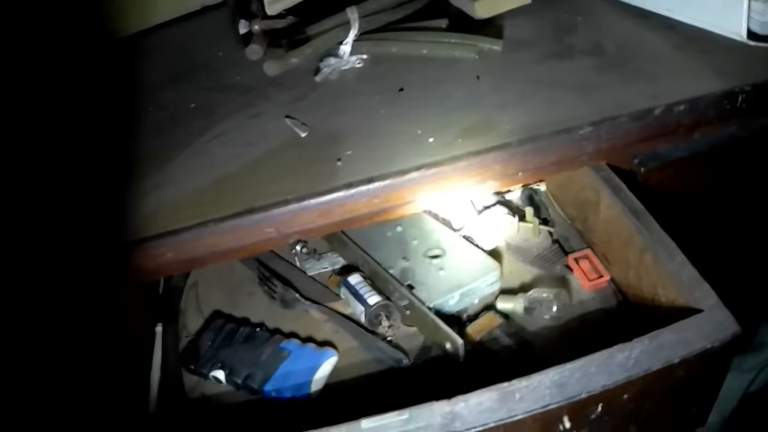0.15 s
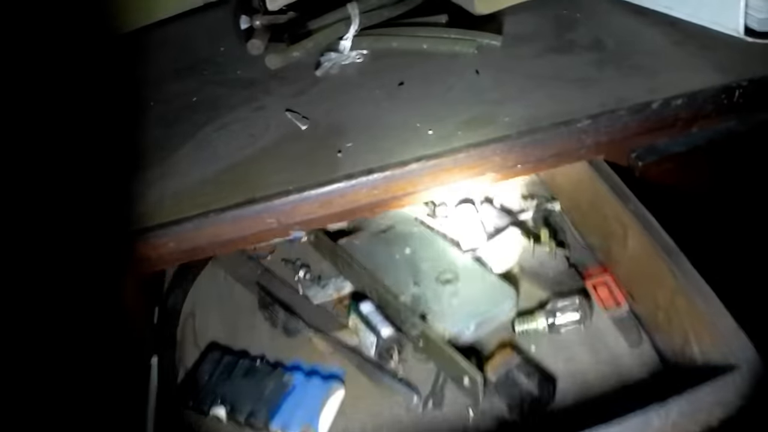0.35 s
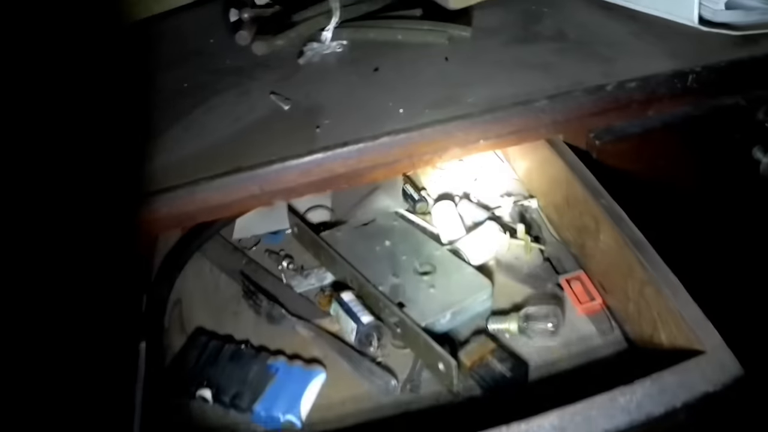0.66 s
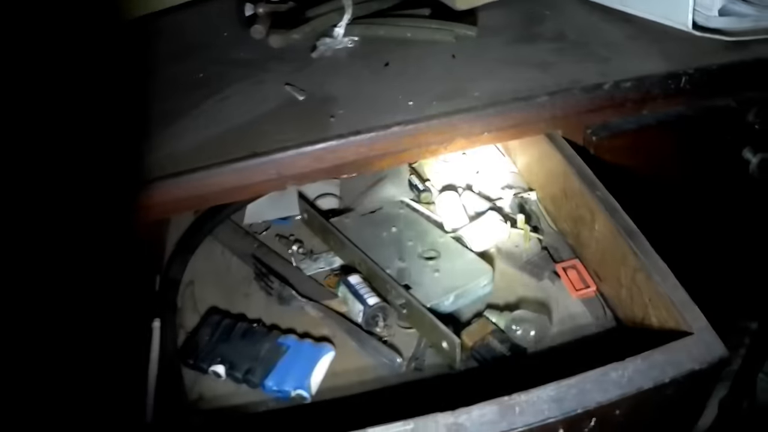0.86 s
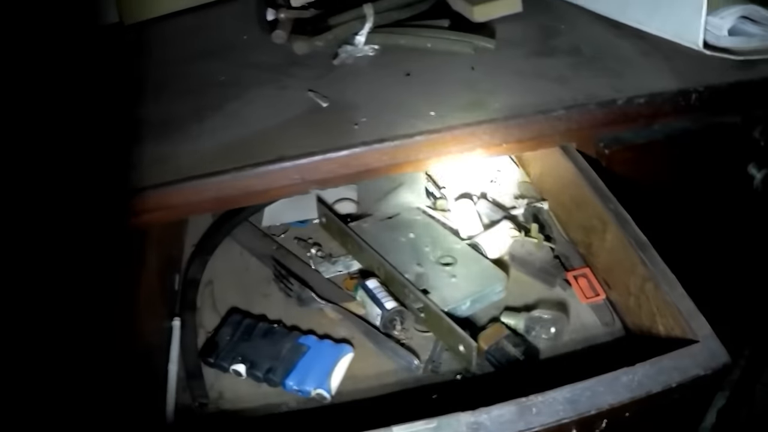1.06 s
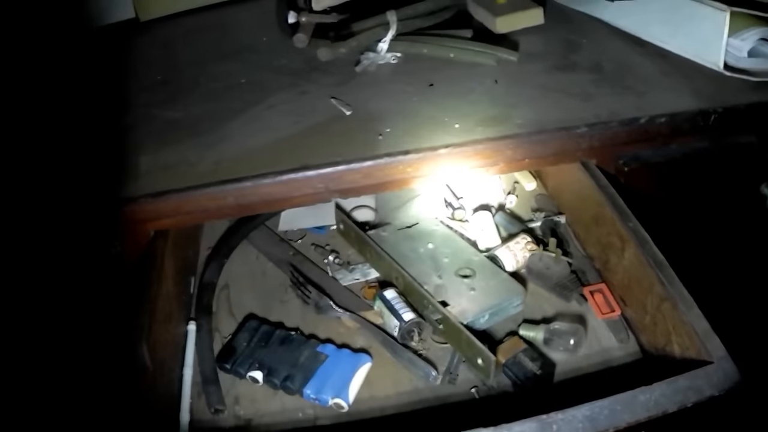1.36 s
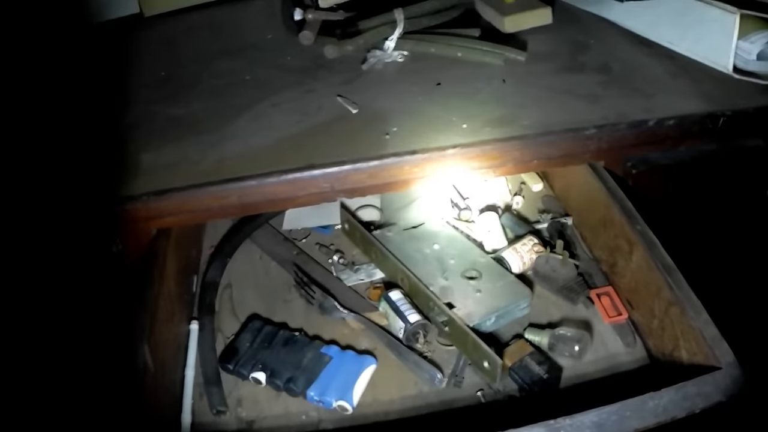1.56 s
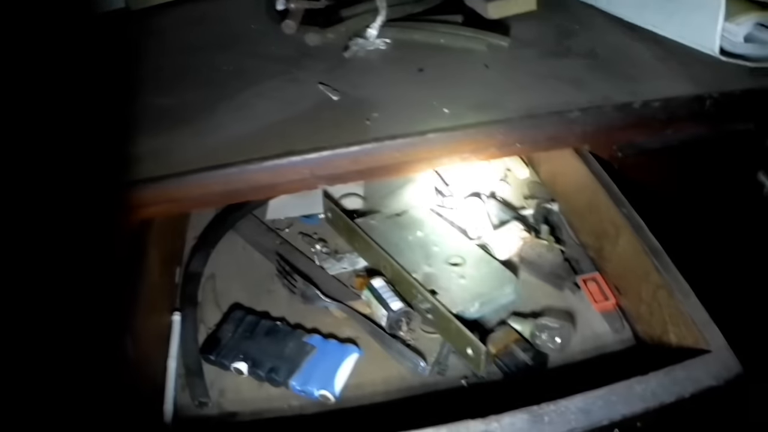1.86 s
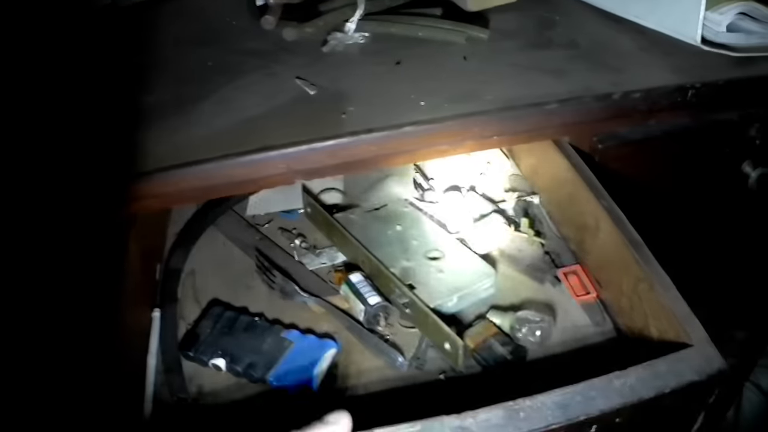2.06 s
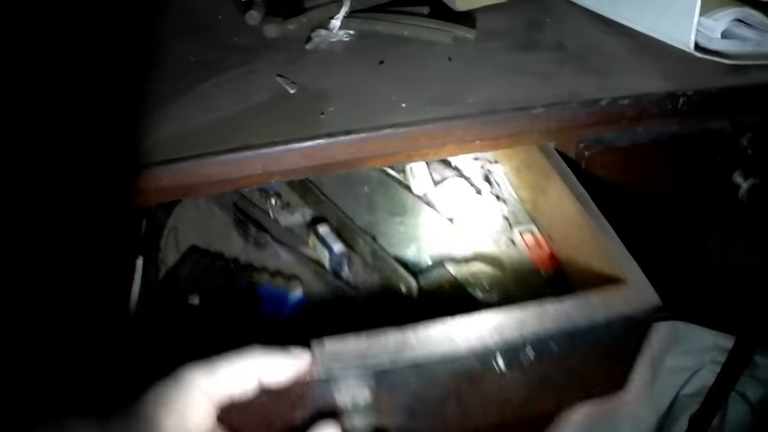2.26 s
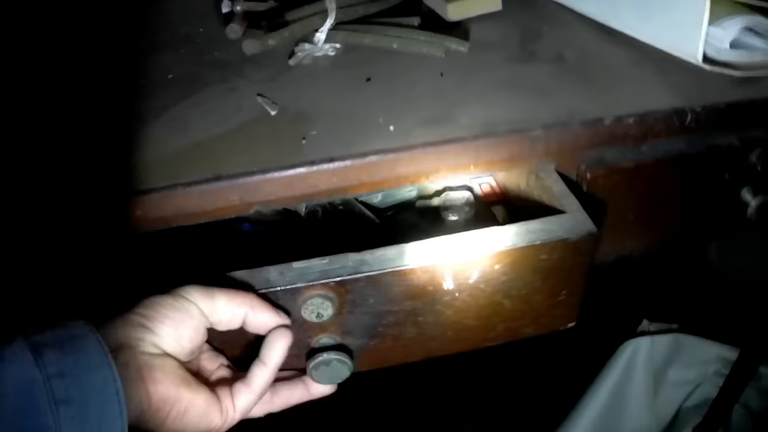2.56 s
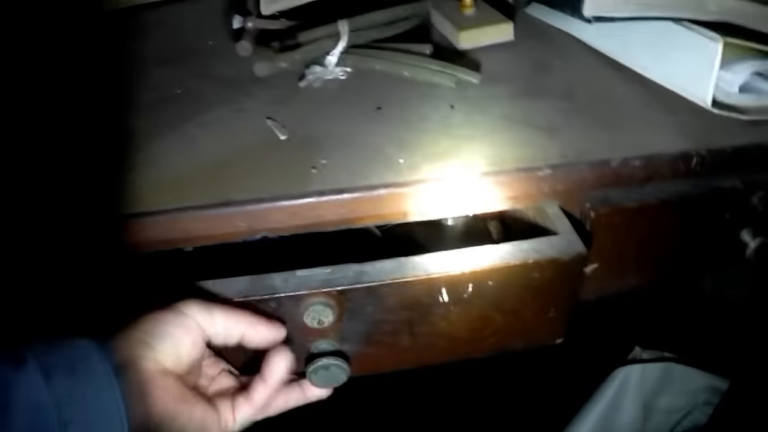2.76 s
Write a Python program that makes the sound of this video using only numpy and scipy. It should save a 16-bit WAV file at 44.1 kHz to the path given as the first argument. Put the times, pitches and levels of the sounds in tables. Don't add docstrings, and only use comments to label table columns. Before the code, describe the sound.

An old wooden drawer gives a dull knock at 0 s, then scrapes open, banging hollowly around 0.2-0.5 s. A glass bulb clinks at 0.6 and rolls; junk ticks and a boxy thump lands near 0.87. From 1.1 to 2 s only quiet room hush, very faint crickets and whine. At 2.2 a sharp rattling knock, then it slides shut with small bumps until 2.75, ending in faint rubs.

```python
import sys
import numpy as np
from scipy import signal
from scipy.fft import rfft, irfft
from scipy.io import wavfile
from scipy.ndimage import uniform_filter1d

SR = 44100
rng = np.random.default_rng(int(sys.argv[2]) if len(sys.argv) > 2 else 0)


def store_pcm(level_fs):
    pcm = np.round(np.clip(level_fs, -1, 1) * 32767).astype(np.int16)
    wavfile.write(sys.argv[1], SR, np.atleast_2d(pcm).T)


def amplitude_ratio(level_db):
    exponent = np.asarray(level_db, float) / 20
    return 10 ** exponent


N = 127890

# t/s, level/dB, box rumble/dB, grit/dB
PULL_DRAG = [
    (.085, -48.5, -20, -6),
    (.15, -36.5, -44, -25),
    (.2, -27, -28, 4.5),
    (.25, -17, 10.5, 2.5),
    (.3, -24.5, 7.5, -16),
    (.36, -25, -3, -24),
    (.45, -29.5, -23, -12),
    (.47, -34, 6.5, -12),
    (.6, -40, 6, -22),
]
PUSH_DRAG = [
    (1.97, -65.5, 23, -6),
    (2.08, -48.5, 3, -8),
    (2.13, -29.5, 1, -9),
    (2.25, -23.5, 1.5, -7.5),
    (2.45, -28, 3.5, -11),
    (2.49, -35.5, 9.5, -18),
    (2.62, -30.5, -9, -1),
    (2.68, -37, 9.5, -6),
    (2.78, -46, 8.5, -1),
]
NUDGE_DRAG = [
    (2.79, -48, 10, -3),
    (2.835, -55, 14, 4),
    (2.845, -46, -12, -6),
    (2.865, -48, -3, -3),
    (2.876, -41, -27, -19),
    (2.9, -47, 6, -9),
]
SETTLE_DRAG = [
    (0, -35.5, 14.5, 6.2),
    (.04, -65, 3, 2),
    (.1, -70, 4, 4),
]
SCUFF_DRAG = [
    (.95, -47, 0, -6),
    (1.035, -45, -5, -10),
    (1.05, -50, -4, -6),
]
# f/Hz, level/dB
SCRAPE_SPECTRUM = [(100, -55), (220, -9), (500, -6), (1100, -6), (2600, -13), (4200, -24), (12500, -54.5),
                   (15500, -76)]
# f/Hz, width/Hz, level/dB
RUNNER_MODES = [(1100, 420, -12), (1527, 36, -14), (2300, 310, -1), (2490, 71, -7), (3500, 1100, -17),
                (6580, 760, -8), (11000, 700, -20.5)]
# t/s, level/dB, length/s, hardness/Hz
THUDS = [(0.001, -19, 0.017, 654), (0.022, -25.5, 0.023, 396), (0.211, -9, 0.011, 1100),
         (0.231, -4, 0.014, 840), (0.253, -4.5, 0.025, 940), (0.281, -31, 0.024, 900),
         (0.375, -6, 0.015, 620), (0.392, -16, 0.014, 696), (0.404, -15.5, 0.0071, 900),
         (0.414, -13, 0.0038, 700), (0.429, -18, 0.0069, 600), (0.446, -21, 0.0097, 900),
         (0.486, -18, 0.011, 1210), (0.866, -15, 0.018, 600), (0.876, -13.5, .014, 870),
         (0.901, -22, .005, 700), (0.927, -28, 0.0098, 450), (2.211, -10.5, 0.011, 1200),
         (2.232, -14, 0.0036, 500), (2.254, -20, 0.0076, 1100), (2.381, -22, .012, 396),
         (2.57, -22, .008, 910), (2.607, -21, 0.018, 905), (2.621, -24, 0.021, 800), (2.639, -29, .01, 700),
         (2.653, -26, 0.0056, 450), (2.678, -23.5, 0.0063, 1000), (2.694, -35, 0.0094, 900),
         (2.732, -28.5, 0.0087, 1200)]
# f/Hz, level/dB, t60/s
BOX_MODES = [(95.4, -12.5, 0.13), (159, -4, 0.033), (237.5, 6.5, 0.035), (304.5, -3, 0.042),
             (380.4, 1.5, 0.068), (504.7, -9, 0.08), (571.5, -2.5, 0.057), (667, 0.5, 0.026),
             (750, -7, 0.017), (837, -4.5, 0.066), (946, -0.5, 0.032), (1162, 5.5, 0.025),
             (1470, -31, 0.054), (2000, -12.5, 0.071)]
# t/s, level/dB, f/Hz, rise/s
SHOVES = [(0.257, -31, 70, .013), (0.41, -39, 62, 0.0082), (0.86, -16, 246, 0.0075),
          (.866, -18, 390, 0.0043), (.868, -22.5, 139, 0.01), (.876, -19, 246.4, 0.0052),
          (.38, -12.5, 242, 0.0077), (.243, -13.5, 520, .012), (2.215, -13.5, 240, 0.0043),
          (2.62, -32, 360, 0.017), (2.27, -31, 55.3, 0.033), (0.21, -14.5, 200, 0.019),
          (0.24, -12, 194, 0.0082)]
# t/s, peak level/dB, f/Hz, t60/s
TICKS = [(.68, -30.5, 582, 0.059), (0.14, -26, 1080, 0.021), (0.167, -25, 1000, 0.019),
         (0.354, -20, 2490, 0.053), (.49, -19, 890, 0.013), (.491, -26, 2820, 0.0073),
         (0.527, -39, 3000, 0.0052), (0.551, -31, 4040, 0.008), (.55, -25, 496, .01),
         (0.551, -23, 2000, 0.0068), (0.723, -27.5, 897, 0.029), (.815, -24.5, 2180, 0.016),
         (.816, -32, 470, 0.034), (0.833, -28, 466, .015), (0.838, -20.5, 2390, 0.0078),
         (.839, -30, 513, .03), (.844, -28, 2300, 0.012), (.861, -32, 2200, 0.0089),
         (1.13, -44, 450, 0.033), (0.151, -23, 1100, 0.024), (1.319, -38.5, 1044, 0.02),
         (2.028, -37.5, 753, 0.071), (2.156, -18, 2300, 0.016), (2.164, -12, 2437, 0.026),
         (2.171, -23, 2540, 0.024), (2.19, -22, 2500, 0.017), (2.209, -9.5, 1490, 0.016),
         (2.211, -23, 955, 0.0087), (2.212, -9, 2030, 0.021), (2.223, -13, 1800, .003),
         (2.21, -12.5, 1210, .015), (2.213, -13, 1650, .012), (2.211, -16, 2400, .01),
           (2.215, -13, 700, .012), (2.262, -17, 1010, .015), (2.566, -27, 900, .02),
           (2.607, -23.5, 910, .025), (2.622, -24, 394, .04), (2.628, -23, 840, 0.03),
           (2.639, -26, 370, .04), (2.652, -22.5, 382, .015), (2.696, -23.5, 526, 0.048),
           (2.708, -25, 479, 0.05), (2.737, -26.5, 870, .015), (2.52, -27, 1490, .015),
           (.214, -15, 1100, 0.018), (.283, -13.5, 1075, .025), (.335, -27, 2510, .04),
           (.41, -16.5, 1260, 0.029), (.885, -20, 496, .05), (.915, -27, 520, .012),
           (.592, -35, 3440, .012), (.839, -29, 2800, .006), (.815, -28, 1900, .006),
           (2.64, -27, 1040, .02), (2.68, -24, 790, 0.023)]
# f/Hz, level/dB, t60/s
GLASS_MODES = [(1263, 7, 0.047), (2400, -18, 0.019), (3400, -3.5, 0.04), (6170, -1, 0.022),
               (5950, -14, 0.14), (7840, -11, 0.021)]
# t/s, level/dB
ROLL_LEVEL = [
    (.6, -32),
    (.66, -35),
    (.78, -33.5),
    (.86, -31.5),
    (.96, -45),
    (1.15, -49),
]
# f/Hz, width/Hz, level/dB
BULB_MODES = [(306, 214, 9.5), (523, 180, 7), (910, 57, -6), (1900, 150, 5), (2400, 86, -3),
              (3710, 110, -1.5), (4550, 170, -3.5)]
# f/Hz, t60/s
ROOM_T60 = [(100, 0.21), (500, 0.22), (2000, 0.26), (8000, 0.15)]
# f/Hz, level/dB
AIR_SPECTRUM = [(15, -17), (25, -1), (116, -3), (198, -2.5), (246, -3), (457, -4.5), (537, -5),
                (2490, -15.5), (15500, -27.5)]
# t/s, level/dB
HUSH_LEVEL = [
    (0, 6),
    (.6, 8.5),
    (1.05, 5.5),
    (1.3, 2),
    (1.8, 0.5),
    (2.05, 2.5),
    (2.9, 4.5),
]


def evened(x):
    return x / np.sqrt(np.mean(x ** 2) + 1e-20)


def read(points, hz):
    f, value = np.transpose(points)
    return np.interp(np.log(hz + 1), np.log(f + 1), value)


def add(mix, s, sound):
    part = mix[round(s * SR):][:len(sound)]
    part += sound[:len(part)]


def resonate(x, hz, width_hz):
    r = np.exp(-np.pi * abs(width_hz) / SR)
    return 2 * signal.lfilter([1 - r], [1, -r * np.exp(2j * np.pi * hz / SR)], x).real


def coloured(x, points):
    gain = amplitude_ratio(read(points, np.fft.rfftfreq(len(x), 1 / SR)))
    return irfft(rfft(x) * gain, len(x))


def band(x, low_hz, high_hz):
    sos = signal.butter(2, [low_hz, min(high_hz, SR / 2.2)], "bandpass", fs=SR, output="sos")
    return signal.sosfilt(sos, x)


def clicks(per_s, spread_db):
    when = rng.random(N) < per_s / SR
    size = np.minimum(rng.exponential(1, N), 4)
    sign = rng.choice([-1., 1.], N)
    return evened(when * sign * amplitude_ratio(spread_db * size))


def along(rows, col, off_db):
    rows = np.array(rows)
    return np.interp(np.arange(N) / SR, rows[:, 0], rows[:, col], off_db, off_db)


def ring(modes, force):
    t = np.arange(int(.4 * SR)) / SR
    body = sum(amplitude_ratio(db - 60 * t / t60) * np.sin(2 * np.pi * hz * t) for hz, db, t60 in modes)
    return signal.fftconvolve(force, body)


def slide(rows):
    runner_db, rumble_db, grit_db = -12.5, -4.5, -18
    judder_db = 0.5 * evened(band(rng.standard_normal(N), 20.4, 30.4))
    slips = clicks(per_s=7000, spread_db=1) * amplitude_ratio(judder_db) * amplitude_ratio(along(rows, 1, -120))
    unit = np.sqrt(np.mean(slips ** 2))
    scrape = coloured(slips, SCRAPE_SPECTRUM)
    scale = unit / np.sqrt(np.mean(band(scrape, 900, 4000) ** 2))
    runner = evened(sum(amplitude_ratio(db) * evened(resonate(slips, hz, w)) for hz, w, db in RUNNER_MODES))
    rumble = evened(ring(BOX_MODES, slips)[:N]) * amplitude_ratio(along(rows, 2, 0))
    grit = evened(band(slips, 4360, 10200)) * amplitude_ratio(along(rows, 3, 0))
    return scale * scrape + unit * (amplitude_ratio(runner_db) * runner + amplitude_ratio(rumble_db) * rumble + amplitude_ratio(grit_db) * grit)


def thud(s, db, length_s, hard_hz, noise, chance):
    wobble_db, hollow_db, crack_db = 4, 0.5, -1
    t = np.arange(len(noise)) / SR
    blow = (t / length_s) ** 0.52 * np.exp(-2 * t / length_s)
    box = np.zeros(len(t))
    for (hz, level_db, t60), c in zip(BOX_MODES, chance):
        swell = signal.fftconvolve(blow, amplitude_ratio(level_db - 60 * t / t60))[:len(t)]
        dulling = 1 + (hz / hard_hz) ** 2
        box += swell / dulling * np.sin(2 * np.pi * hz * (1 + 0.021 * c) * t + 9 * c)
    box *= amplitude_ratio(wobble_db * evened(band(band(noise, 8.9, 79), 8.9, 79)))
    hollow = band(noise[::-1], 121, hard_hz) * blow
    crack = band(band(noise, 950, 2100), 640, 3400) * blow
    knock = box / abs(box).max() + amplitude_ratio(hollow_db) * hollow / abs(hollow).max() + amplitude_ratio(crack_db) * crack
    return s, amplitude_ratio(db) * knock


def shove(s, db, hz, rise_s):
    t = np.arange(int(.25 * SR)) / SR
    return s, amplitude_ratio(db) * t / rise_s * np.exp(1 - t / rise_s) * np.sin(2 * np.pi * hz * t)


def tick(s, db, hz, t60, noise):
    t = np.arange(len(noise)) / SR
    tap = band(noise * np.exp(-t / .001), hz / 1.6, hz * 1.6)
    tone = resonate(tap, hz, 1.33 / t60)
    return s, amplitude_ratio(db) * (tone / abs(tone).max() + 0.13 * tap / abs(tap).max())


def bulb():
    clink_s, clink_db, snap_db, roll_wide_db = 0.598, -20, -4, 0
    bumps = band(clicks(per_s=2400, spread_db=2.6), 320, 4800) * amplitude_ratio(along(ROLL_LEVEL, 1, -120))
    lines = np.zeros(N)
    for hz, width_hz, db in BULB_MODES:
        line = resonate(resonate(bumps, hz, 1.3 * width_hz), hz, 1.1 * width_hz)
        lines += amplitude_ratio(db) * evened(line)
    wide = evened(band(bumps, 200, 1850))
    out = np.sqrt(np.mean(bumps ** 2)) * (evened(lines) + amplitude_ratio(roll_wide_db) * wide)
    clink = ring(GLASS_MODES, rng.standard_normal(600) * np.exp(-np.arange(600) / 130))
    add(out, clink_s, amplitude_ratio(clink_db) * clink / abs(clink).max())
    snap = rng.standard_normal(300) * np.exp(-np.arange(300) / 60)
    add(out, clink_s, amplitude_ratio(clink_db + snap_db) * band(band(snap, 4500, 8200), 4000, 7500))
    return out


def room(x):
    taps = np.zeros(SR)
    at = np.arange(300, SR - 20, 20)
    taps[at + rng.integers(0, 20, len(at))] = rng.choice([-1., 1.], len(at))
    hz, t, z = signal.stft(taps, SR, nperseg=256)
    decay = amplitude_ratio(-60 * t / read(ROOM_T60, hz)[:, None])
    tail = signal.istft(z * decay, SR, nperseg=256)[1]
    return signal.fftconvolve(x, tail / np.linalg.norm(tail))[:N]


def air():
    air_db, cricket_db, whine_db = -48.5, -70, -74
    cricket_hz, cricket_width_hz, chirps_per_s, whine_hz = 10660, 280, 27, 7552
    t = np.arange(N) / SR
    hush = evened(coloured(rng.standard_normal(N), AIR_SPECTRUM))
    hush = hush * amplitude_ratio(0.41 * evened(band(rng.standard_normal(N), 2.2, 26)))
    chirps = rng.standard_normal(N) * (0.77 + .5 * np.sin(2 * np.pi * chirps_per_s * t)) ** 2
    for _ in range(2):
        chirps = resonate(chirps, cricket_hz, cricket_width_hz)
    whine = np.sin(2 * np.pi * whine_hz * t)
    hush = amplitude_ratio(air_db + along(HUSH_LEVEL, 1, 0)) * hush
    return hush + amplitude_ratio(cricket_db) * evened(chirps) + amplitude_ratio(whine_db) * whine


def scene():
    mic_hz, room_db = 70, -12.5
    desk = bulb()
    for drag in (PULL_DRAG, PUSH_DRAG, NUDGE_DRAG, SETTLE_DRAG, SCUFF_DRAG):
        desk += slide(drag)
    for row in THUDS:
        add(desk, *thud(*row, rng.standard_normal(4000), rng.standard_normal(len(BOX_MODES))))
    for row in TICKS:
        add(desk, *tick(*row, rng.standard_normal(5000)))
    desk = signal.sosfilt(signal.butter(2, mic_hz, "highpass", fs=SR, output="sos"), desk)
    for row in SHOVES:
        add(desk, *shove(*row))
    return (desk + amplitude_ratio(room_db) * room(desk) + air())[None]


def top_cut(x):
    return signal.sosfilt(signal.butter(12, 15630, fs=SR, output="sos"), x)


def record(dry):
    edge_hz, drop_hz, drop_s, drop_length_s = 15700, 8700, .584, .03
    spectrum = rfft(np.clip(dry, -1, 1))
    hz, t = np.fft.rfftfreq(N, 1 / SR), np.arange(N) / SR
    inside = abs(t - drop_s - drop_length_s / 2) < drop_length_s / 2
    lost = uniform_filter1d(1. * inside, size=150)
    limited = irfft(spectrum * (hz < edge_hz), N)
    top = irfft(spectrum * (hz > drop_hz) * (hz < edge_hz), N)
    return top_cut(limited - .97 * lost * top)


dry = scene()
out = record(dry)
store_pcm(out)
```